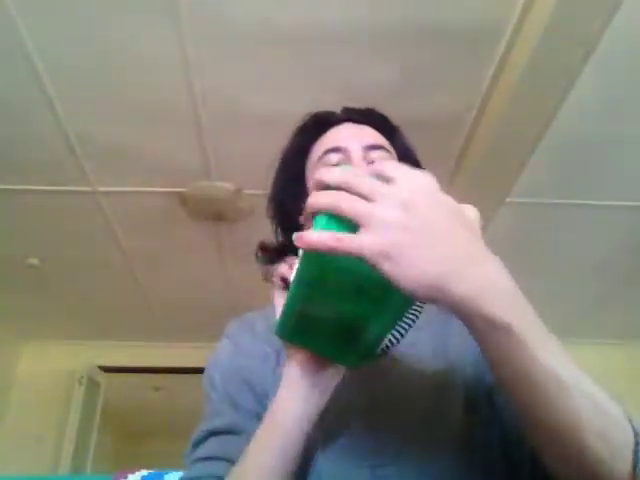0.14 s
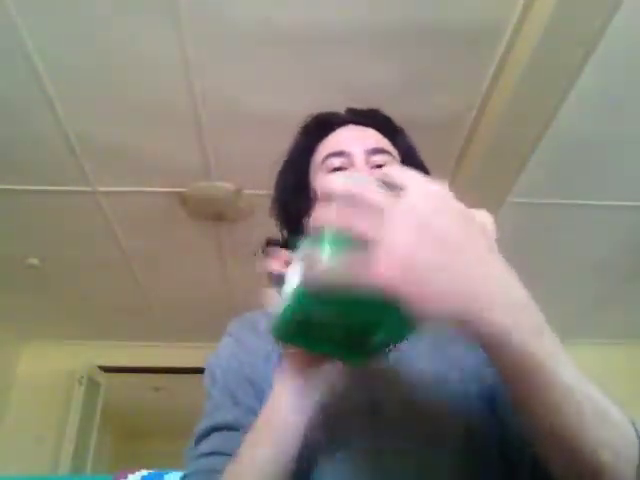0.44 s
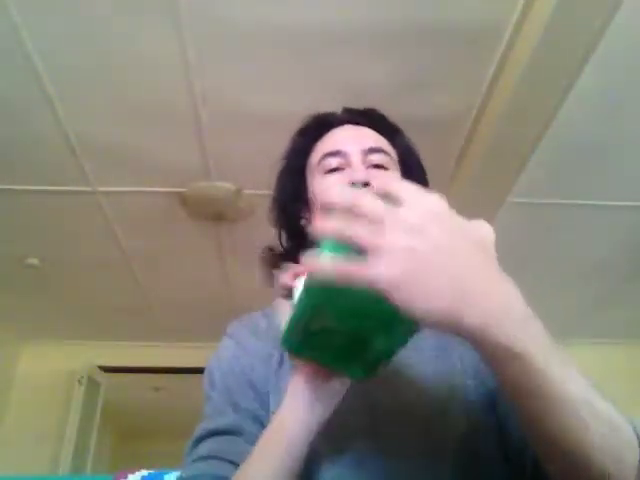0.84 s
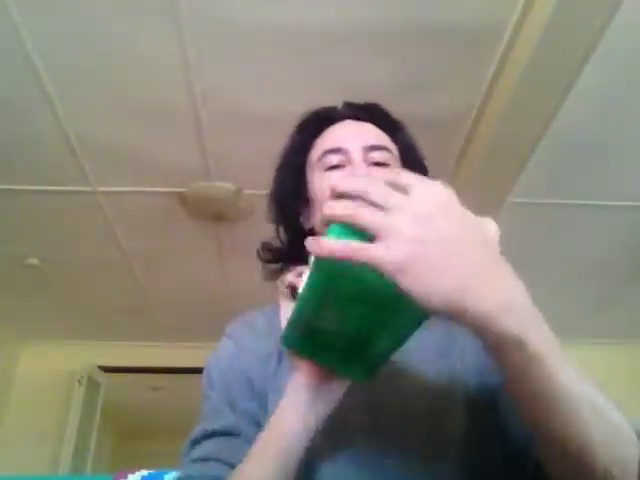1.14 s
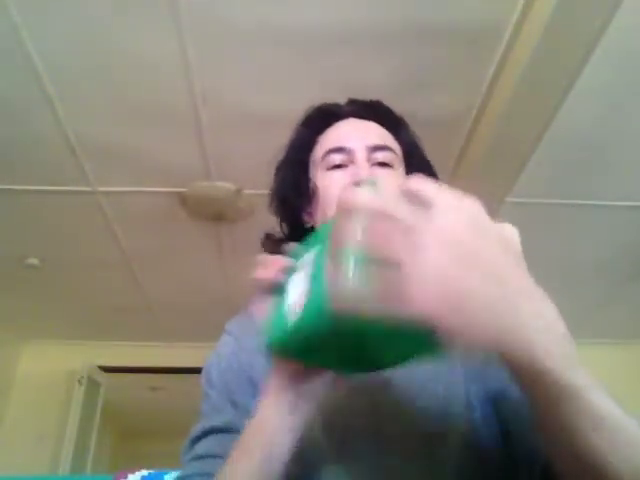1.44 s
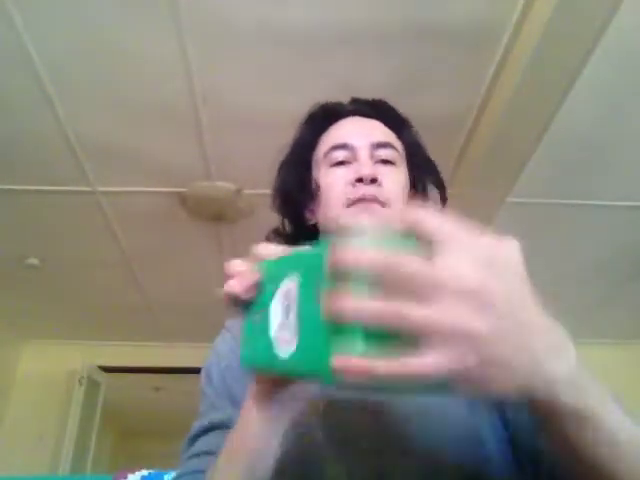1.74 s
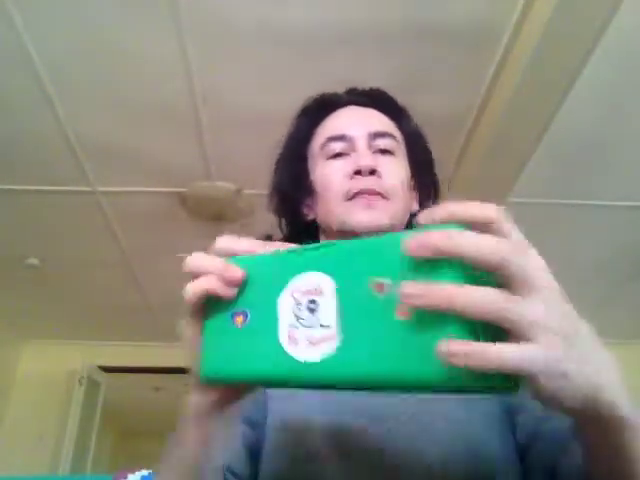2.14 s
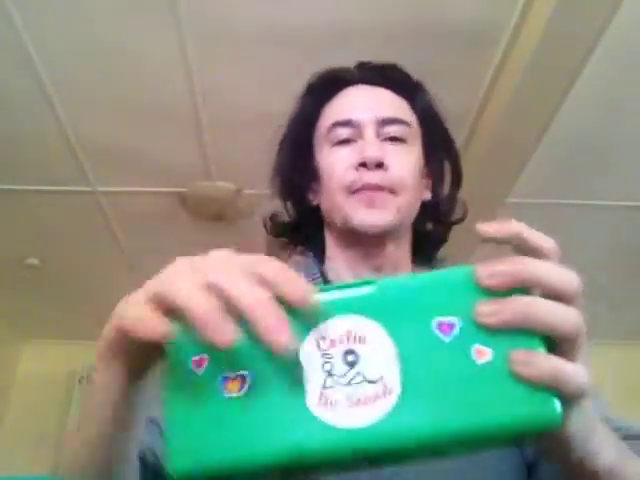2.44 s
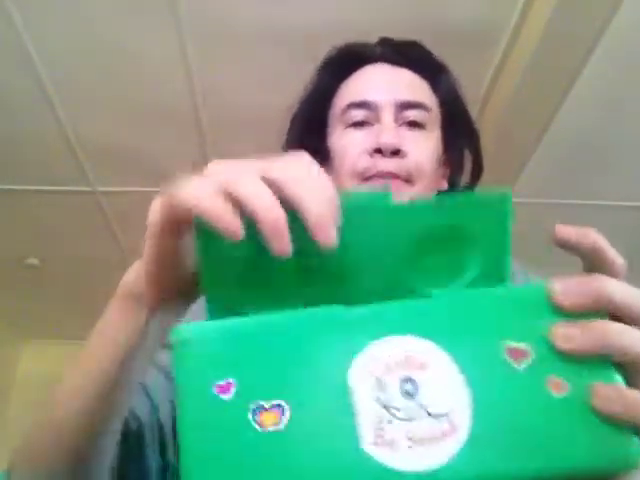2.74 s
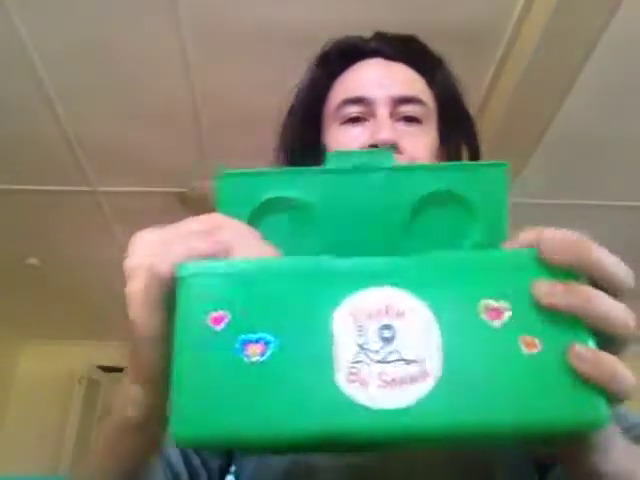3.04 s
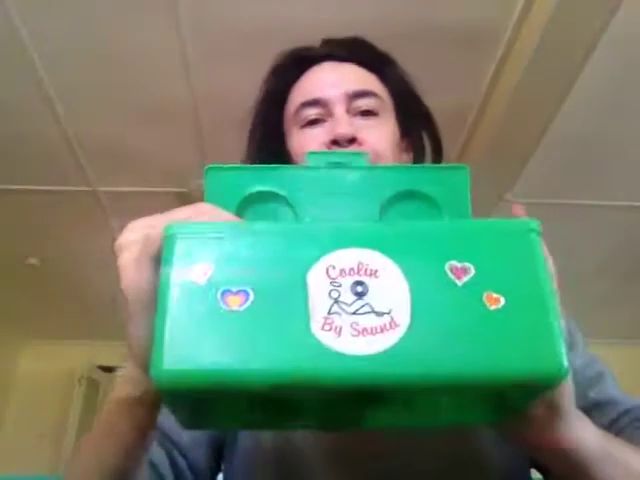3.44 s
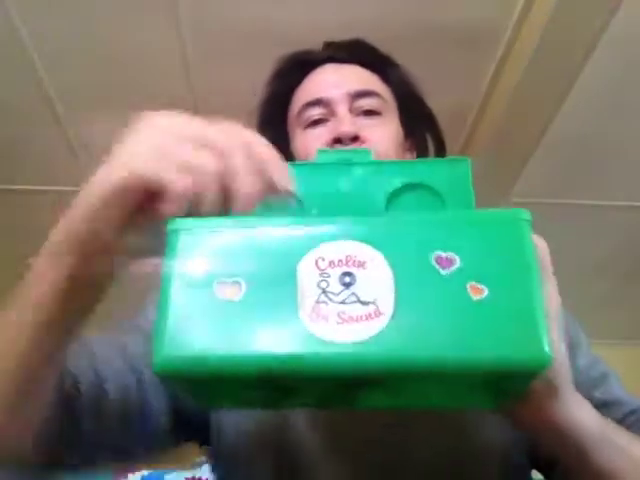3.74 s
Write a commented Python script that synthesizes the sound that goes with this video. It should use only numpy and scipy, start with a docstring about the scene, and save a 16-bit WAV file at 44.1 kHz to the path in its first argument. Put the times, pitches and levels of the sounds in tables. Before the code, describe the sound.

A plastic box of small hard pieces is shaken vigorously from 0 to about 2.2 s, nine strokes at four a second, each a short slide then a louder slam, with sharp clacks. Pieces tumble to rest by 2.5 s. The latch clicks and the lid pops at 2.57-2.66 s. Clicks, knocks and faint scrapes cluster near 3.0-3.2 s, then sparse soft taps; a brief stir rattles from 3.85 s. Close, dry small room, faint background hum-like hush.

```python
"""Shaken box of small pieces

Close by in a small, quiet room, a plastic box of small hard pieces is shaken nine times, about four a second.
In each shake the pieces slide back, then slam into the front wall; afterwards they tumble to rest.
The lid is unlatched and popped open, fingers knock on the box, and a hand starts to stir the pieces.
Pieces are showers of brief noisy clacks, walls are dying sines, and the room is a decaying noise tail."""
import sys
import numpy as np
from scipy import signal
from scipy.io import wavfile
from scipy.ndimage import uniform_filter1d, minimum_filter1d

SR = 44100
rng = np.random.default_rng(int(sys.argv[2]) if len(sys.argv) > 2 else 0)


def put_to_file(sound):
    """Save the sound as 16-bit audio at rate SR, in the file named by the first command-line argument."""
    columns = np.atleast_2d(sound).T  # one column per channel
    safe = np.clip(columns, -1, 1)
    whole_steps = np.round(safe * 32767)
    wavfile.write(sys.argv[1], SR, whole_steps.astype(np.int16))


N = 171990
TIME = np.arange(N) / SR
BINS = np.fft.rfftfreq(4096, 1 / SR)


def amp(db):
    """Decibels to gain."""
    return 10 ** (np.asarray(db) / 20)


def unit(x):
    """Scales to an energy of one."""
    return x / np.sqrt(np.sum(x ** 2) + 1e-20)


def read(points, hz):
    """Reads a table on a log-frequency axis."""
    table_hz, value = np.transpose(points)
    return np.interp(np.log(hz + 1), np.log(table_hz), value)


def add(mix, s, sound):
    """Mixes a sound in at time s."""
    part = mix[max(round(s * SR), 0):][:len(sound)]
    part += sound[:len(part)]


def colour(points, peaks=()):
    """Minimum-phase impulse response of a spectrum with resonances on top, at an energy of one."""
    db = read(points, BINS)
    for hz, width, lift in peaks:
        db = db + lift / (1 + (2 * (BINS - hz) / width) ** 2)
    log_gain = np.log(amp(np.r_[db, db[-2:0:-1]]))  # mirrored to negative frequencies
    spectrum = np.exp(np.conj(signal.hilbert(log_gain)))
    return unit(np.fft.ifft(spectrum).real[:len(BINS)])


LOW_CUT_HZ = 303


def ring(modes):
    """Dying sines of a struck wall, with the deep bass cut away."""
    t = TIME[:SR // 8]
    sines = sum(amp(db - 60 * t / t60) * np.sin(2 * np.pi * hz * t) for hz, db, t60 in modes)
    high_pass = signal.butter(3, LOW_CUT_HZ, "high", fs=SR, output="sos")
    return unit(signal.sosfilt(high_pass, sines))


PIECE_T60_S, PIECE_LO_HZ, PIECE_HI_HZ = 0.027, 548, 4520
PIECE_NOISE, PIECE_TONE = 1.32, 0.5  # gains beside a unit click


def contact(body):
    """One sharp contact with its own brief plastic ring, heard through a body."""
    t = TIME[:SR // 25]
    decay = amp(-60 * t / PIECE_T60_S)
    hz = PIECE_LO_HZ * (PIECE_HI_HZ / PIECE_LO_HZ) ** rng.random()
    noise = unit(rng.standard_normal(len(t)) * decay)
    tone = unit(np.sin(2 * np.pi * hz * t) * decay)
    clack = PIECE_NOISE * noise + PIECE_TONE * tone
    clack[0] += 1
    return unit(signal.fftconvolve(clack, body))


SPREAD_DB = 3.5  # scale of the uneven force


def rattle(level, per_s, body, count=40):
    """Many pieces collide at uneven moments and with uneven force, following a level."""
    slots = np.arange(int(N / SR * per_s) - 2)
    chance = rng.random((len(slots), 4))
    at = np.minimum((slots + 2 * chance[:, 0]) / per_s * SR, N - 1).astype(int)
    extra_db = SPREAD_DB * np.minimum(-np.log(1 - chance[:, 1]), np.pi)
    force = amp(extra_db) * np.sign(chance[:, 2] - .5)
    force = unit(force) * np.sqrt(N) * level[at]
    pieces, out = [contact(body) for _ in range(count)], np.zeros(N)
    for i, push, which in zip(at, force, chance[:, 3]):
        add(out, i / SR, push * pieces[int(which * count)])
    return out


def swell(start, end, rise, fall):
    """Attack, hold and release."""
    return np.exp(np.minimum(TIME - start, 0) / rise - np.maximum(TIME - end, 0) / fall)


SLIDE_RISE_S, SLIDE_FALL_S, SLIDE_GAP_S = 0.02, 0.054, 0.034
SLAM_RISE_S, SLAM_FALL_S = 0.0082, 0.034


def follow(curve):
    """Gain along a level curve, fading outside it."""
    s, db = np.transpose(curve)
    return amp(np.interp(TIME, s, db)) * swell(s[0], s[-1], SLAM_RISE_S, SLIDE_FALL_S)


# Strokes of the box: (slide start [s], slide level [dB], slam start [s], slam length [s], slam level [dB])
STROKES = [(0.01, -21.5, 0.072, 0.071, -17.5), (0.243, -20, 0.33, 0.047, -16),
           (0.493, -22.5, 0.57, 0.077, -18), (.758, -22, 0.83, 0.064, -15.5), (1, -21, 1.089, 0.023, -16),
           (1.247, -25, 1.334, 0.055, -17.5), (1.508, -19.5, 1.585, 0.037, -15.5),
           (1.742, -23, 1.838, 0.048, -17), (1.995, -23, 2.103, 0.055, -15)]
# Colour of pieces sliding on the floor: (frequency [Hz], relative level [dB])
SLIDE_COLOUR = [(40, -42), (110, -35), (200, -9), (330, 2), (650, -2.5), (1130, -4.5), (1800, 1),
                (2800, -5.5), (4200, -8), (5500, -12), (7400, -16.5), (9500, -26), (11500, -37),
                (13000, -33.5), (16000, -31.5)]
# Colour of pieces slamming into the wall: (frequency [Hz], relative level [dB])
SLAM_COLOUR = [(40, -48), (110, -40), (180, -28.5), (260, -2.5), (400, 0), (720, -1.5), (1130, -4.5),
               (1800, 1), (2800, -4.5), (4200, -7.5), (5500, -12), (7400, -17), (9500, -25.5), (11500, -34),
               (13000, -32), (16000, -38.5)]
# Resonances of the closed box: (frequency [Hz], width [Hz], lift [dB])
BOX_RESONANCES = [(331, 43, 2.5), (533, 56, 3.5), (920, 75, 6), (6960, 160, 8)]
SLIDE_PER_S, SLAM_PER_S = 420, 520  # collisions per second


def shaking():
    """The pieces slide back along the floor of the box, then slam into the front wall."""
    slide, slam = np.zeros((2, N))
    for slide_s, slide_db, slam_s, length, slam_db in STROKES:
        slide += amp(slide_db) * swell(slide_s, slam_s - SLIDE_GAP_S, SLIDE_RISE_S, SLIDE_FALL_S)
        slam += amp(slam_db) * swell(slam_s, slam_s + length, SLAM_RISE_S, SLAM_FALL_S)
    sliding = rattle(slide, SLIDE_PER_S, colour(SLIDE_COLOUR, BOX_RESONANCES))
    return sliding + rattle(slam, SLAM_PER_S, colour(SLAM_COLOUR, BOX_RESONANCES))


# Single hard hits on the wall: (time [s], level before the common trim [dB], strongest ring [Hz])
WALL_HITS = [(0.039, 4, 940), (0.054, 7.5, 567), (0.069, 10.5, 954), (0.089, 7, 945), (0.1, 9.5, 1640),
             (0.121, 12, 1770), (0.171, 1.5, 1030), (0.213, 2, 860), (0.228, -1.5, 530), (0.251, 7.5, 1770),
             (0.292, -2, 2860), (0.305, 9, 960), (0.322, 6.5, 960), (0.329, 8, 900), (0.338, 12.5, 900),
             (0.351, 9, 930), (0.544, 0, 1710), (0.564, 8.5, 840), (0.59, 13, 1830), (0.605, 5.5, 1930),
             (0.625, 7, 1950), (0.647, 5.5, 850), (0.782, 6, 2400), (0.805, 1.5, 890), (0.814, 7.5, 880),
             (0.828, 6.5, 890), (0.836, 10, 910), (0.897, 5.5, 1750), (0.917, 9.5, 1910), (1.03, 1.5, 1710),
             (1.055, 5, 2100), (1.067, 7.5, 1800), (1.077, 8.5, 1960), (1.09, 9, 880), (1.094, 9, 693),
             (1.237, 2, 915), (1.267, 3.5, 950), (1.33, 9.5, 910), (1.341, 7.5, 910), (1.361, 8, 1390),
             (1.393, 6, 2390), (1.504, 4.5, 1600), (1.573, 8.5, 933), (1.594, 6, 1950), (1.619, 10, 925),
             (1.721, -2, 1810), (1.83, 7.5, 1930), (1.856, 8, 1850), (1.971, 4, 1870), (2.016, 3.5, 2310),
             (2.027, 3.5, 734), (2.087, 6, 860.3), (2.097, 9, 2290), (2.106, 7, 1770), (2.128, 8, 2170),
             (2.136, 9.5, 2130), (2.146, 9.5, 1260), (2.261, -5.5, 2270), (2.29, -4, 1730),
             (2.313, -8.5, 930), (2.342, -8, 2170), (2.366, -5, 2150), (2.412, -2.5, 1230),
             (2.444, -11, 1700), (2.493, -17, 670)]
HIT_TRIM_DB, HIT_RING_GAIN, HIT_T60_S, HIT_BUILD_S = -1.5, 0.84, 0.029, .0005
HIT_TILT_DB_PER_OCT = -2.5  # higher patches ring more softly


def hard_hits():
    """Single pieces strike the wall squarely and ring one patch of it."""
    out, body = np.zeros(N), colour(SLAM_COLOUR, BOX_RESONANCES)
    for s, db, hz in WALL_HITS:
        add(out, s, amp(db + HIT_TRIM_DB) * contact(body))
        patch = ring([(hz, 0, HIT_T60_S)])
        build_up = 1 - np.exp(-TIME[:len(patch)] / HIT_BUILD_S)
        tilt_db = HIT_TILT_DB_PER_OCT * np.log2(hz / BOX_RESONANCES[2][0])
        ring_gain = amp(db + HIT_TRIM_DB + tilt_db) * HIT_RING_GAIN
        add(out, s, ring_gain * unit(patch * build_up))
    return out


# Colour of pieces rubbing together: (frequency [Hz], relative level [dB])
CHAFE_COLOUR = [(200, -40), (2500, -8), (5000, -2), (7000, 2), (9000, -9), (11500, -16), (13000, -13),
                (16000, -17)]
CHAFE_DB, CHAFE_PER_S, CHAFE_FALL_S = -44, 2500, .12


def chafing():
    """While the box moves, the pieces rub against each other in a fine, steady fizz."""
    level = amp(CHAFE_DB) * swell(STROKES[0][0], SETTLING[0][0], SLIDE_RISE_S, CHAFE_FALL_S)
    return rattle(level, CHAFE_PER_S, colour(CHAFE_COLOUR, BOX_RESONANCES))


# Pieces tumbling to rest in the box: (time [s], level [dB])
SETTLING = [(2.16, -43), (2.22, -31), (2.28, -31), (2.3, -28), (2.36, -29.5), (2.42, -34.5), (2.48, -43.5),
            (2.55, -47), (2.62, -63), (2.85, -76)]
# Pieces stirred by hand: (time [s], level [dB])
STIRRING = [(3.835, -55), (3.85, -39.5), (3.858, -27.5), (3.878, -30), (3.9, -37)]
# Colour of the pieces with the lid open: (frequency [Hz], relative level [dB])
OPEN_BOX_COLOUR = [(60, -40), (200, -22), (450, -5), (700, -1.5), (1800, 0.5), (3700, -6.5), (5000, -17.5),
                   (7300, -19.5), (10000, -34), (16000, -44)]
TUMBLE_DB, SETTLE_PER_S, SETTLE_TOP_HZ, STIR_PER_S = -34, 330, 8500, 800


def loose_pieces():
    """Pieces tumble all through the shaking and come to rest; later a hand stirs them in the open box."""
    tumble = amp(TUMBLE_DB) * swell(STROKES[0][0], SETTLING[0][0], SLIDE_RISE_S, SLIDE_FALL_S)
    closed = rattle(follow(SETTLING) + tumble, SETTLE_PER_S, colour(SLIDE_COLOUR, BOX_RESONANCES))
    low_pass = signal.butter(1, SETTLE_TOP_HZ, fs=SR, output="sos")
    soft = signal.sosfilt(low_pass, closed)
    open_body = colour(OPEN_BOX_COLOUR, [(586, 130, 10.7), (6950, 260, 5)])  # Hz, width Hz, lift dB
    return soft + rattle(follow(STIRRING), STIR_PER_S, open_body)


# Latch, hinge and fingers: (time [s], click level [dB], knock level [dB], knock pitch [Hz])
HAND_TAPS = [(2.57, -11.5, -26, 596), (2.58, -11, -32, 604), (2.587, -10.5, -17, 670),
             (2.649, -14, -16, 610), (2.657, -16, -17, 450), (2.781, -30.5, -41, 520),
             (2.995, -26, -20.5, 590), (3.025, -29.5, -23, 535), (3.047, -29, -20, 626),
             (3.052, -11, -17.5, 540), (3.058, -11.5, -17, 700), (3.077, -14, -27, 620),
             (3.088, -12.5, -35, 740), (3.101, -15, -33, 560), (3.11, -19, -32, 600),
             (3.121, -17.5, -18, 655), (3.145, -24, -31, 580), (3.18, -31, -29, 620),
             (3.2, -26.5, -42, 510), (3.213, -40, -19.5, 695), (3.294, -26, -31, 500),
             (3.301, -29, -23, 590), (3.339, -35, -24, 563), (3.419, -30.5, -44, 637),
             (3.481, -33, -23, 566), (3.489, -41, -24.5, 680), (3.572, -28, -22, 472),
             (3.587, -30, -25, 540), (3.822, -37, -35, 595), (3.844, -30, -25, 576)]
# Modes of the knocked wall: (multiple of the knock pitch [ratio], relative level [dB], 60 dB decay [s])
KNOCK_MODES = [(.68, -12, 0.026), (1, 2.5, 0.037), (1.24, -5.5, 0.023), (2.1, -14, .025)]
# Modes of the lid snapping free: (frequency [Hz], relative level [dB], 60 dB decay [s])
LID_MODES = [(257, -6, 0.061), (330, -3, 0.072), (397, 2, 0.043), (514, 7, 0.027), (670, 1, .024),
             (1254, 2, .025)]
# Fingers and lid scraping over the plastic: (time [s], level [dB])
SCRAPING = [(2.89, -72), (2.94, -60), (3.02, -67), (3.055, -42.5), (3.11, -47), (3.16, -57), (3.24, -65),
            (3.33, -61), (3.37, -80), (3.5, -81), (3.57, -59), (3.61, -80)]
# Resonances under the scrape: (frequency [Hz], width [Hz], lift [dB])
SCRAPE_RESONANCES = [(590, 200, 10), (7300, 410, 10)]
# Colour of clicks and scrapes: (frequency [Hz], relative level [dB])
CLICK_COLOUR = [(60, -40), (200, -18.5), (450, -4.5), (700, -1), (1800, 0.5), (3400, -6.5), (5000, -19),
                (7300, -22.5), (10000, -44), (16000, -43)]
SCRAPE_PER_S = 1000
POP_S, POP_DB, REBOUND_S, REBOUND_DB = 2.649, -5.5, .011, -3  # the rebound is relative to the pop


def handling():
    """Latch, hinge and fingers click, knock and scrape on the box; the lid snaps free and rebounds."""
    out = rattle(follow(SCRAPING), SCRAPE_PER_S, colour(CLICK_COLOUR, SCRAPE_RESONANCES))
    body = colour(CLICK_COLOUR)
    for s, click_db, knock_db, hz in HAND_TAPS:
        add(out, s, amp(click_db) * contact(body))
        modes = [(hz * multiple, db, t60) for multiple, db, t60 in KNOCK_MODES]
        add(out, s, amp(knock_db) * ring(modes))
    add(out, POP_S, amp(POP_DB) * ring(LID_MODES))
    add(out, POP_S + REBOUND_S, amp(POP_DB + REBOUND_DB) * ring(LID_MODES))
    return out


def noise_band(lo_hz, hi_hz):
    """Noise of level one between two edges."""
    sos = signal.butter(2, [lo_hz, hi_hz], "band", fs=SR, output="sos")
    return unit(signal.sosfilt(sos, rng.standard_normal(N))) * np.sqrt(N)


RUB_S, RUB_WIDTH_S, RUB_HZ, RUB_BAND_HZ, RUB_DB = 3.74, 0.095, 3730, 350, -71.5


def rub():
    """A faint narrow hiss as a hand slides over the plastic."""
    level = amp(RUB_DB) * np.exp(-((TIME - RUB_S) / RUB_WIDTH_S) ** 2)
    return level * noise_band(RUB_HZ - RUB_BAND_HZ / 2, RUB_HZ + RUB_BAND_HZ / 2)


# Decay of the small room: (frequency [Hz], 60 dB decay [s])
ROOM_DECAY = [(150, 0.1), (500, 0.31), (1500, 0.26), (4000, .3), (8000, .28), (15000, .28)]
ROOM_BUILD_S = 0.0036


def room(x):
    """A short diffuse tail, each band dying at its own speed."""
    hz, t, bands = signal.stft(rng.standard_normal(SR // 2), SR, nperseg=256)
    fading = bands * amp(-60 * t / read(ROOM_DECAY, hz)[:, None])
    tail = signal.istft(fading, SR, nperseg=256)[1]
    build_up = np.minimum(TIME[:len(tail)] / ROOM_BUILD_S, 1)
    return signal.fftconvolve(x, unit(tail * build_up))[:N]


# Colour of the quiet place: (frequency [Hz], relative level [dB])
FLOOR_COLOUR = [(30, -28.5), (90, -20.5), (170, -5.5), (350, -2), (560, 0.5), (750, -3.5), (960, -1.5),
                (1400, -8), (2800, -16.5), (3800, -20.5), (4600, -20), (7000, -26), (10500, -32),
                (15000, -33)]
# Resonances in the background: (frequency [Hz], width [Hz], lift [dB])
FLOOR_RESONANCES = [(540, 40, 5), (960, 14, 11)]
FLOOR_DB = -62


def room_tone():
    """Quiet steady background of coloured noise."""
    body = colour(FLOOR_COLOUR, FLOOR_RESONANCES)
    noise = rng.standard_normal(N + len(body) - 1)
    return amp(FLOOR_DB) * signal.fftconvolve(noise, body, "valid")


RATTLE_ROOM_DB, TAP_ROOM_DB = -14.5, -10.5  # echo against direct sound


def scene():
    """The box close by, its echo and the quiet room."""
    pieces = shaking() + chafing() + hard_hits() + loose_pieces()
    hands = handling() + rub()
    echo = room(amp(RATTLE_ROOM_DB) * pieces + amp(TAP_ROOM_DB) * hands)
    return (pieces + hands + echo + room_tone())[None]


CEILING, LIMIT_S, EDGE_HZ = .71, .0012, 15400


def record(dry):
    """At the microphone: a fast limiter holds down the highest peaks, then the treble is band-limited."""
    span = max(round(LIMIT_S * SR), 1)
    needed_gain = CEILING / np.maximum(abs(dry), CEILING)
    gain = uniform_filter1d(minimum_filter1d(needed_gain, span), span)
    low_pass = signal.firwin(511, EDGE_HZ, window=("kaiser", 9), fs=SR)
    return signal.oaconvolve(dry * gain, low_pass[None], "same")


dry = scene()
out = record(dry)
put_to_file(out)
```